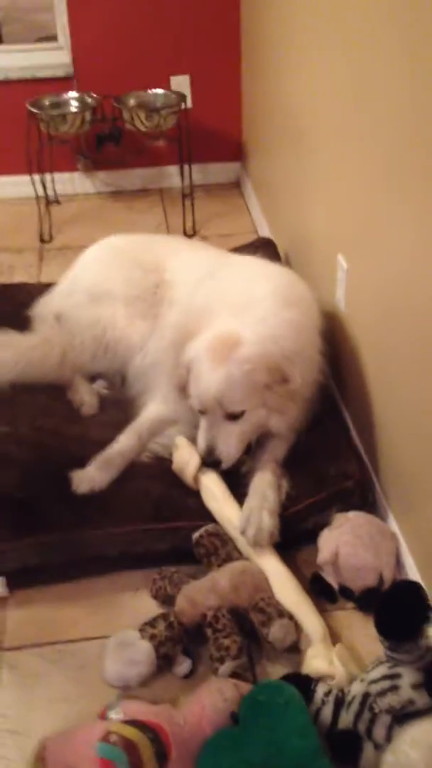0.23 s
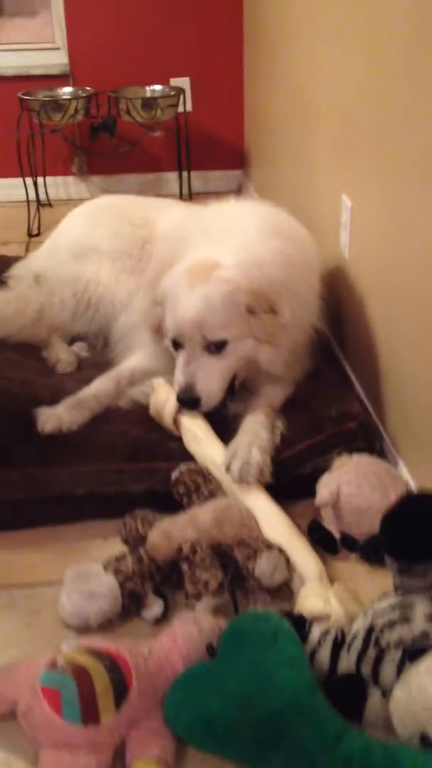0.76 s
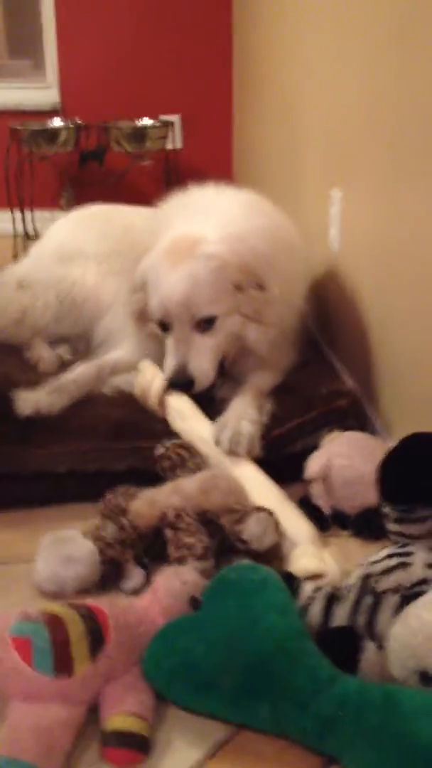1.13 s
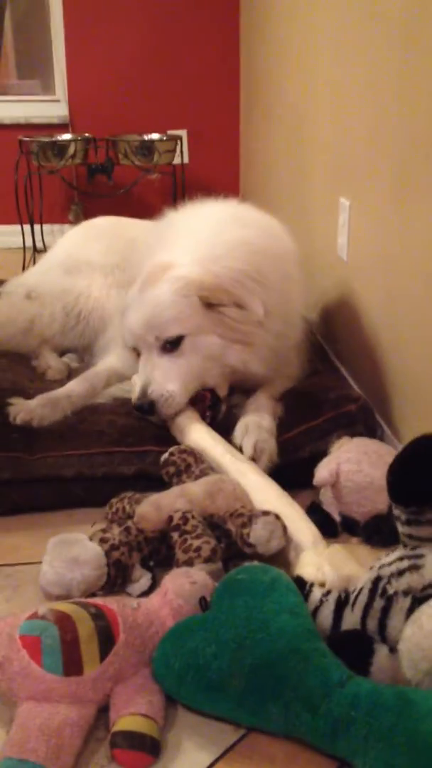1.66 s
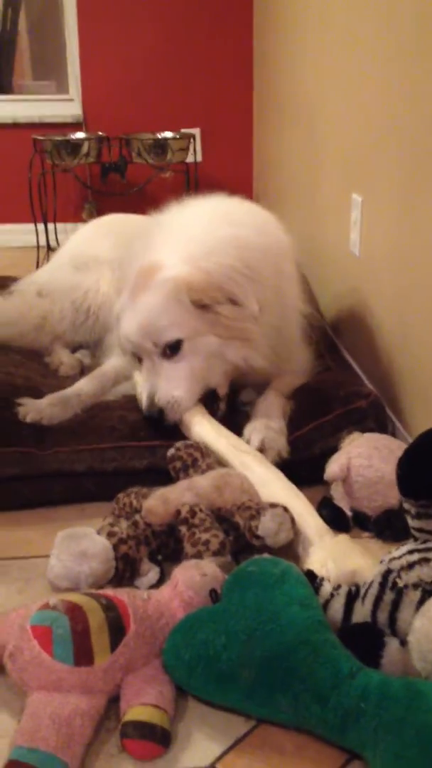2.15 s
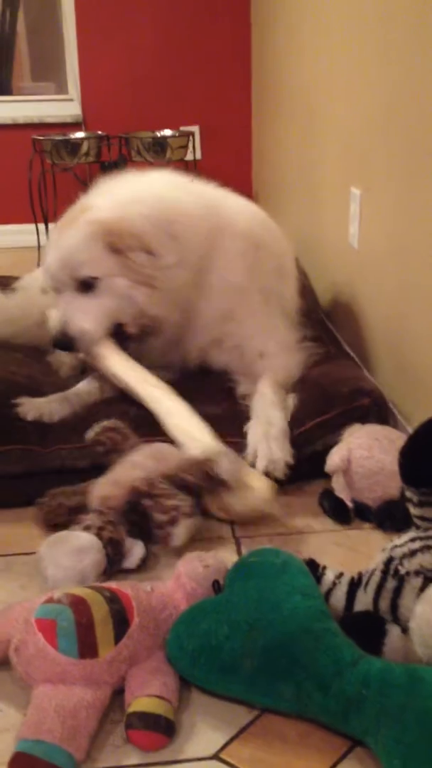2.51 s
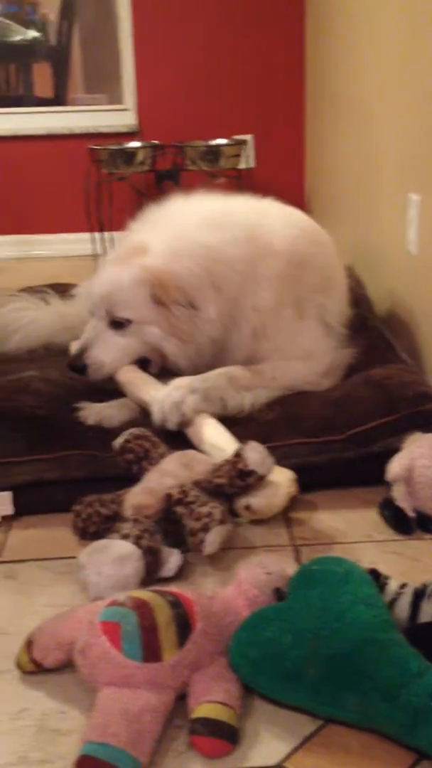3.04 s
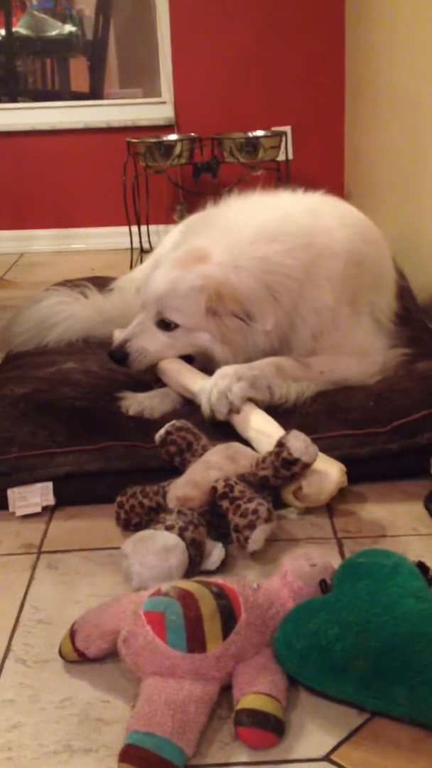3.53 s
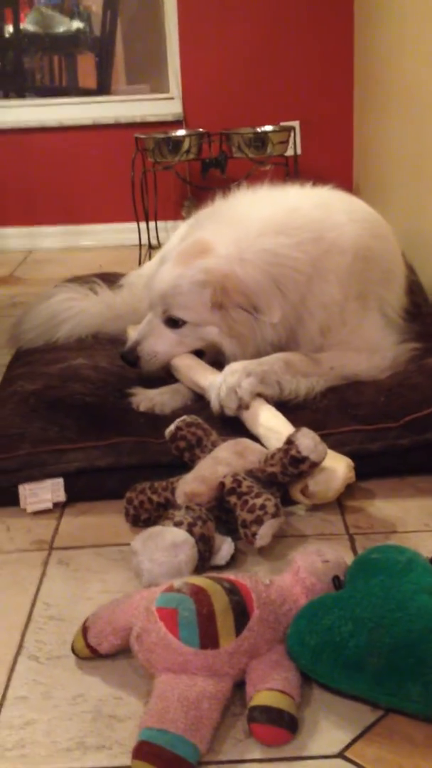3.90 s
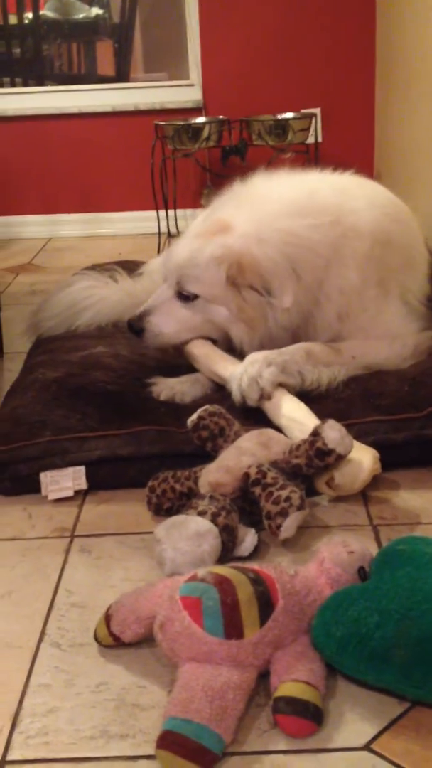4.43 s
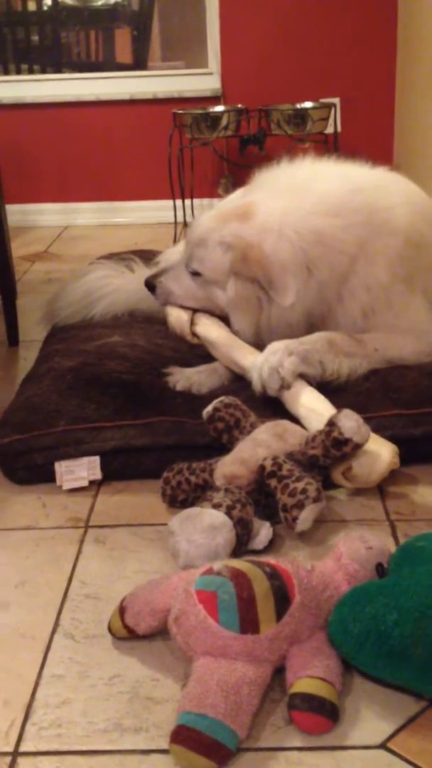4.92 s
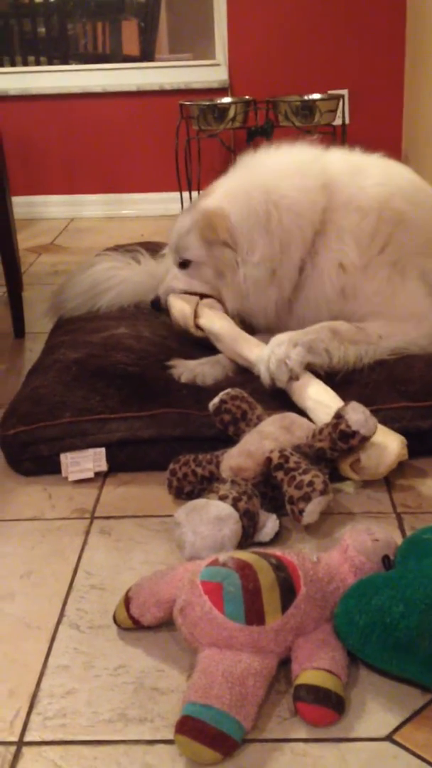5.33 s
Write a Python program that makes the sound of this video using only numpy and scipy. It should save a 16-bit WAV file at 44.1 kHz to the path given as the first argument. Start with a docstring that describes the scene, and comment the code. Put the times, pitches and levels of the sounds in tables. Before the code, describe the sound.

A large dog gnaws a dry rawhide bone on its bed in a hard, tiled room, heard from about two metres, identical in both channels. From 0 to 1.3 seconds there are only faint, scattered ticks, small soft knocks and a light brushing hiss. At about 1.4 the teeth bite in: brittle, hollow snaps and short gritty scrapes crowd together until 1.85, the hardest around 1.7 to 1.84, with dull bone knocks. After a brief lull, a denser grinding crunch runs from 2.2 to 2.5, with bedding shifting darkly. One bright, crisp crack comes at 2.82, with a small follow-up at 2.89. Weak nibbles at 3.3 to 3.65 lead to a compact crunch at 3.8 to 3.93. Then sparse, faint ticks and muted knocks near 4.2, 4.5 and 5.0 fade toward 5.5. Short room echoes trail the cracks; a faint wavering low hum and soft hiss persist.

```python
"""A dog gnaws a dry rawhide bone on its bed in a tiled room, two metres from one microphone.
Teeth crack and grind the hide: noise bursts and grainy strokes excite short damped resonances.
The bone knocks dully (brief low pushes with a puff of noise); a bright hiss swells, partly as a wash
around the cracks, and the bedding shifts darkly, both as coloured noise.
Echoes and a decaying noise tail form the hard room, over a faint wavering hum, drone and steady hiss."""
import sys
import numpy as np
from scipy import signal
from scipy.fft import rfft, irfft, next_fast_len
from scipy.io import wavfile
from scipy.ndimage import uniform_filter1d

SR = 44100
rng = np.random.default_rng(int(sys.argv[2]) if len(sys.argv) > 2 else 0)


def dump_mix(stems):
    """Bounce the given channels to the path in sys.argv[1] as a 16-bit WAV at rate SR."""
    frames = np.atleast_2d(stems).T  # one column per channel
    limited = np.clip(frames, -1, 1)  # hard clip at full scale
    pcm = np.round(limited * 32767).astype(np.int16)
    wavfile.write(sys.argv[1], SR, pcm)


N = 244975

# dull knocks of the bone on the bed: (time [s], level [dB], pitch [Hz])
KNOCK_EVENTS = [(0.169, -52, 478), (0.332, -51, 182), (0.567, -51.5, 385), (0.679, -78, 686),
                (1.426, -51, 223), (1.499, -55, 406), (1.727, -41, 475), (1.838, -41.5, 598),
                (1.976, -40.5, 430), (2.838, -52.5, 412), (2.887, -46, 394), (3.066, -69, 233),
                (3.476, -49, 550), (4.207, -57.5, 216.5), (4.491, -45.5, 295), (4.766, -57.5, 196),
                (4.782, -66, 690), (4.945, -48, 570), (4.992, -45.5, 537), (5.02, -53, 810)]
# free end of the bone: pitch under grinding, width always
END_HZ, END_WIDTH_HZ = 2135, 327


def amp(db):
    """Amplitude gain of a level in dB."""
    return 10 ** (np.asarray(db) / 20)


def unit(x):
    """x scaled to rms 1."""
    return x / np.sqrt(np.mean(x ** 2) + 1e-20)


def along(points, hz, column=1):
    """A column of (Hz, value, ..) points, interpolated on a log-frequency axis."""
    p = np.transpose(points)
    return np.interp(np.log(hz + 1), np.log(p[0] + 1), p[column])


def curve(rows, column=1, outside=-200):
    """A column of (s, value, ..) rows, one value per sample; `outside` beyond the rows."""
    p = np.transpose(rows)
    return np.interp(np.arange(N) / SR, p[0], p[column], outside, outside)


def filtered(x, response):
    """x filtered by a complex response of frequency."""
    size = next_fast_len(N + SR // 2)
    hz = np.fft.rfftfreq(size, 1 / SR)
    return irfft(rfft(x, size) * response(hz), size)[..., :N]


def ringing(modes, order=1):
    """Causal response of damped (Hz, width Hz, dB) modes passed order times, unit power for white noise."""
    def raw(hz):
        total = 0
        for k, (centre, width, db) in enumerate(modes):
            damping = 1j * hz * abs(width)
            sign = (-1) ** k
            total = total + sign * amp(db / order) * damping / (centre ** 2 - hz ** 2 + damping)
        return total ** order

    def response(hz):
        h = raw(hz)
        return h / np.sqrt(np.mean(abs(h) ** 2))

    return response


def grainy(rate, spread_db):
    """Noise of rms 1 whose gain wanders between random knots, rate a second."""
    knots = np.clip(rng.standard_normal(int(N * 2000 / SR) + 2), -2.2, 2.2)
    wander = np.interp(np.arange(N) * rate / SR, np.arange(len(knots)), knots)
    return unit(rng.standard_normal(N) * amp(spread_db * wander))


def rush(x, spectrum, patchy_db):
    """Coloured noise of rms 1 with time-frequency patches of random gain."""
    z = signal.stft(x, nperseg=512)[2]
    field = uniform_filter1d(rng.standard_normal(z.shape), size=6, axis=0)
    field = uniform_filter1d(field, size=10, axis=1)
    patched = signal.istft(z * amp(patchy_db * unit(field)), nperseg=512)[1][:N]
    return unit(filtered(patched, lambda hz: amp(along(spectrum, hz))))


def stroke(start_s, hold_s, attack_s, fade_db_per_s):
    """Gain that rises linearly, then fades exponentially once attack_s + hold_s have passed."""
    t = np.arange(N) / SR - start_s
    return np.clip(t / attack_s, 0, 1) * amp(-fade_db_per_s * np.maximum(t - attack_s - hold_s, 0))


def swelling_hiss():
    """Bright, grainy coloured noise that swells, partly as a reverberant wash around the cracks."""
    # spectrum: (frequency [Hz], relative density [dB])
    hiss_spectrum = [(350, -35.5), (600, -21), (1410, -1), (1640, 2), (2180, 1), (3800, 1), (4700, 2),
                     (5400, -3), (6640, 1.5), (9360, -13), (13800, -12), (15400, -16), (16000, -42)]
    # swells: (time [s], level [dB])
    hiss_level = [(0, -67), (.12, -71), (.18, -64.5), (.38, -58.5), (.56, -62), (.8, -62.5), (1.05, -58.5),
                  (1.19, -64), (1.31, -69.5), (1.42, -64.5), (1.78, -76), (1.85, -58), (2.17, -71),
                  (2.27, -51.5), (2.5, -53.5), (2.8, -71.5), (2.86, -50.5), (3.1, -73), (3.78, -73),
                  (3.89, -63), (4.01, -71), (4.5, -76.5), (5.45, -75.5), (5.55, -70)]
    return amp(curve(hiss_level)) * rush(grainy(rate=700, spread_db=1.0), hiss_spectrum, patchy_db=1.6)


def bedding():
    """Bedding shifts as dark, grainy coloured noise, also stirred by each knock."""
    # spectrum: (frequency [Hz], relative density [dB])
    bedding_spectrum = [(70, -13), (130, -1.5), (190, 4), (280, -2.5), (500, -4.5), (850, -5), (1500, -10),
                        (3000, -59)]
    # shifting: (time [s], level [dB])
    bedding_level = [(0, -74), (.12, -72), (.2, -65), (.8, -65), (1.1, -63), (1.35, -70.5), (1.7, -66),
                     (2.15, -60), (2.42, -52.5), (2.62, -65), (2.8, -72), (2.92, -55.5), (3.14, -59),
                     (3.3, -68), (3.6, -68.5), (4.15, -72.5), (4.32, -66), (4.7, -81), (5.02, -64.5),
                     (5.2, -73), (5.55, -72)]
    # stirring by a -50.5 dB knock, growth per dB of knock, fade
    settle_db, settle_db_per_db, settle_fade_db_per_s = -57.5, 0.94, 452

    stirred = np.zeros(N)
    for s, db, _ in KNOCK_EVENTS:
        level_db = settle_db + settle_db_per_db * (db + 50.5)
        stirred += amp(level_db) * stroke(s, 0, 0.011, settle_fade_db_per_s)
    gain = np.hypot(amp(curve(bedding_level)), stirred)
    return gain * rush(grainy(rate=70, spread_db=1.5), bedding_spectrum, patchy_db=2.0)


def background():
    """A far appliance's hum, wavering in level and phase, its resonant-noise drone, and steady hiss."""
    # drone mode: (frequency [Hz], width [Hz], relative level [dB])
    drone_mode = [(186.2, 20, 0)]
    # steady hiss spectrum: (frequency [Hz], relative density [dB])
    steady_spectrum = [(20, 13), (60, 16.5), (100, 5.5), (200, 8), (400, 5.5), (850, -22), (1500, -6),
                       (5700, -25), (10000, -19.5), (14500, -10.5)]
    hum_hz, hum_db = 120, -73.5  # level before the waver

    waver = unit(uniform_filter1d(rng.standard_normal((2, N)), size=3000, axis=1))
    phase = 2 * np.pi * hum_hz * np.arange(N) / SR + 0.9 * waver[1]
    hum = np.sqrt(2) * amp(hum_db + 3.5 * waver[0]) * np.sin(phase)
    drone = amp(-77.0) * filtered(rng.standard_normal(N), ringing(drone_mode, order=2))
    steady_hiss = amp(-70.5) * rush(rng.standard_normal(N), steady_spectrum, patchy_db=0.0)
    return hum + drone + steady_hiss


def colours(hz, end_hz, end_db, order, blur=1):
    """Responses of the hide's four rings; the lowest also carries the free end's narrow mode."""
    # one list per ring, low to top: (frequency [Hz], width [Hz], relative level [dB])
    hide_rings = [
        [(1483, 590, 2), (2560, 760, 5)],
        [(3053, 1020, 0), (4125, 555, 9), (4810, 610, 1.5)],
        [(5490, 800, -3), (6570, 520, 0), (7720, 1000, -12)],
        [(10300, 4600, -20), (12600, 3200, 27)],
    ]
    out = []
    for modes in hide_rings:
        blurred = [(centre, blur * width, db) for centre, width, db in modes]
        out.append(ringing(blurred, order)(hz))
    out = np.array(out)
    out[0] += amp(end_db) * ringing([(end_hz, END_WIDTH_HZ, 0)], order)(hz)
    return out


def cracks():
    """Bursts of tiny fractures ring the hide; returns sound toward the microphone and its room send."""
    # (time [s], length [ms], low ring level [dB], bite: middle over low [dB], sharpness: top over low [dB])
    crack_rows = [(0.1484, 4.8, -58.5, 0, -20), (0.2169, 0.48, -59, 0, -23), (0.246, 1.4, -70, 10, -17),
                  (0.2717, .2, -56.5, -1, -28), (0.3557, .32, -51.5, 6.5, -38),
                  (0.5734, 0.77, -66.5, 13, -3), (0.6795, 3.5, -60, -8, -8), (0.8312, 0.15, -64, 16, -1),
                  (1.3374, 6.5, -56.5, -1, -13), (1.4223, 1.3, -54.5, -6, -23),
                  (1.4432, 0.66, -41, -1, -26), (1.4524, 0.2, -39, -8, -36), (1.4579, 1.4, -38.5, -22, -34),
                  (1.4791, 1, -52.5, 3, -20), (1.547, 0.78, -43.5, -6, -38), (1.5542, 0.65, -36, -18, -36),
                  (1.5566, 2.1, -44, -2.5, -26), (1.575, 2.4, -53, -16, -30), (1.5893, 1.6, -52, 5.5, -26),
                  (1.6151, 2.1, -55, -14, -26), (1.6434, 0.36, -41, -18, -38),
                  (1.693, .3, -31.5, -13.5, -33), (1.7164, .4, -48, -18, -36), (1.7323, 2.3, -54.5, 2, -11),
                  (1.777, 0.52, -36, -17, -33), (1.7985, 1.3, -42, -8, -23), (1.8192, 0.37, -30, -8.5, -31),
                  (1.8269, 0.79, -49, -12, -25), (1.836, 3.3, -37, 0.5, -16), (1.8402, 1.85, -28, 0.5, -27),
                  (1.977, 2.3, -55.5, 6.5, -14), (1.9803, 4.3, -52.5, -1, -29),
                  (2.0827, 0.44, -48, -7, -23), (2.0934, 3.8, -52, -10, -26), (2.2045, 4, -38, -11, -28),
                  (2.2086, 5, -45, -19, -35), (2.2203, 0.36, -39, -31, -31), (2.2313, 1, -42, -14, -29),
                  (2.2367, 2.3, -38, -16, -27), (2.2462, 1.3, -40, -10, -30), (2.2681, 1.34, -33, -13, -26),
                  (2.2779, 0.89, -47, -11, -25), (2.2891, 2.4, -39.5, -3, -18), (2.307, 11.8, -35, -1, -31),
                  (2.3171, 0.59, -36.5, 6.5, -36), (2.356, 2.4, -51.5, 6, -23),
                  (2.3856, 1.1, -52.5, 13.5, -16), (2.415, 3.8, -48.5, 3, -36),
                  (2.4253, 1.4, -39, 2.5, -34), (2.429, 3.8, -39, 2, -34), (2.4734, 2.7, -38, -1, -25),
                  (2.542, 1.1, -50.5, 2, -7), (2.7302, 0.95, -61, -8, -10), (2.8177, 2.06, -35, -2, -9.5),
                  (2.8235, 0.49, -49, -5, -16), (2.8347, 0.4, -48.5, 6, -15),
                  (2.8923, 0.78, -42.5, -2.5, -31), (3.0709, .91, -53, -5, -23),
                  (3.3119, 1.6, -62, -13, -16), (3.3781, 0.99, -62.5, -14, -27),
                  (3.4764, 3.4, -60, -3, -23), (3.498, 1.6, -60, -2, -33), (3.616, 1.8, -63, 0, -24),
                  (3.6424, 4, -55.5, 1.5, -30), (3.657, 2.2, -55.5, -7, -35),
                  (3.8141, 0.73, -43.5, -0.5, -24), (3.8226, 0.36, -42.5, 2, -29),
                  (3.8532, 0.76, -41, -4, -40), (3.8894, 1.05, -38, -1, -1), (3.9092, 0.65, -43, 5, -20),
                  (3.927, 0.66, -44.5, -22, -22), (4.2062, 0.73, -56.5, -9, -41),
                  (4.2585, 2.2, -63.5, -9, -24), (4.4932, 1, -59.5, -7, -16), (4.4992, 4.1, -56.5, 0, -18),
                  (4.541, 2.5, -58.5, -12, -26), (4.939, 1.2, -59, 6.5, -13), (4.9535, 2.5, -58, 0, -21),
                  (4.9947, 6.1, -70, -8, -12), (5.013, 2.1, -62, -14, -23), (5.2994, 1.9, -70, -16, -17),
                  (5.4748, 3, -64, -12, -27), (5.5208, 1.44, -58.5, -7, -31)]
    # shifting grip and turning head: (time [s], free-end pitch [Hz], room send [dB])
    grip = [(0, 1990, 10), (1.3, 1610, 7.5), (1.5, 2370, 1), (1.65, 2130, 4), (2.1, 2130, 4.5),
            (2.24, 2150, -10), (2.33, 2150, 0.5), (2.45, 2370, 5), (2.83, 2090, 5.5), (3.1, 1510, 16.5),
            (3.65, 1770, 10.5), (3.82, 2340, -1.5), (3.93, 2120, 6.5), (4.2, 1790, 9), (4.49, 2330, 11.5),
            (4.6, 2380, 2), (4.95, 1910, 10.5), (5.55, 1500, 15)]
    # low ring of jaw and bed, heard only via the room: (frequency [Hz], width [Hz], relative level [dB])
    body_mode = [(892, 164, 0)]
    # high ring: share of the way from bite to sharpness (capped), plus an offset
    high_share, high_offset_db, sharp_cap_db = 0.44, 5.5, -9
    end_db_per_bite_db = -0.28  # a duller crack rings the free end more

    direct, spread = np.zeros(N + SR), np.zeros(N + SR)
    t = np.arange(1024) / SR
    hz = np.fft.rfftfreq(2048, 1 / SR)
    body = irfft(ringing(body_mode)(hz))
    end_pitch_hz, send_db = curve(grip), curve(grip, column=2)
    for s, ms, db, bite, sharp in crack_rows:
        start = round(s * SR)
        end_hz = end_pitch_hz[start]
        high = bite + high_share * (min(sharp, sharp_cap_db) - bite) + high_offset_db
        ring_db = db + np.array([0, bite, high, sharp])
        ms = max(ms, .15)
        # full strength for ms, then 60 dB down per 0.6 ms
        fractures = rng.standard_normal(len(t)) * amp(-60 * np.maximum(t - ms / 1000, 0) / 0.0006)
        fractures[0] += 5 * (ms < 2.5)  # a short crack starts with one clean snap
        end_db = 1 + end_db_per_bite_db * bite
        rung = irfft(rfft(fractures, 2048) * colours(hz, end_hz, end_db, order=2))
        # broader rings: the smoother sum over all directions
        snap = irfft(colours(hz, end_hz, end_db=-4.5, order=1, blur=2.13))
        size = amp(ring_db) * np.sqrt(SR * (ms + 1) / 1000)  # level over ms + 1 to energy
        at = slice(start, start + len(body))
        direct[at] += (size / np.linalg.norm(rung, axis=1)) @ rung
        all_round = (size / np.linalg.norm(snap, axis=1)) @ snap
        spread[at] += amp(send_db[start]) * (all_round + amp(-15) * size[1] * body)
    return direct[:N], spread[:N]


def grinding():
    """Teeth stroke along the hide: a dense grainy stream of fractures rings it and the free end."""
    # (start [s], hold [s], low ring level [dB], level change per step up the rings [dB])
    grind_rows = [(1.327, 0.065, -70.5, -0.5), (1.421, 0.028, -54, -7), (1.534, 0.037, -49, -6),
                  (1.7, 0.028, -66, -1.5), (1.801, .035, -52.5, -3.5), (2.189, 0.072, -48, -7),
                  (2.268, 0.043, -50.5, -2.5), (2.332, 0.077, -51.5, -5.5), (2.44, 0.083, -54, -6),
                  (3.5, 0.039, -67.5, -6.5), (3.593, 0.24, -70.5, -3.5), (3.805, 0.14, -52.5, -4),
                  (4.927, 0.06, -61, -4.5), (5.47, 0.065, -70, -5)]
    # steps from the low ring to each ring: (steps)
    ring_steps = [0, 1.5, 2.2, 5.5]
    press_s, let_go_db_per_s = 0.022, 304
    end_db, end_step = -10.5, -0.76  # free end: stronger in duller strokes

    steps = np.append(ring_steps, end_step)[:, None]
    levels = amp(np.hstack([db + steps * step_db for _, _, db, step_db in grind_rows]))
    strokes = np.array([stroke(s, hold, press_s, let_go_db_per_s) for s, hold, _, _ in grind_rows])
    force = grainy(rate=500, spread_db=4.0) * (levels @ strokes)
    hide = filtered(force[:-1], lambda hz: colours(hz, END_HZ, end_db=-17, order=2)).sum(axis=0)
    free_end = filtered(force[-1], ringing([(END_HZ, END_WIDTH_HZ, 0)], order=2))
    return hide + amp(end_db) * free_end


def gnawing():
    """Cracks and grinding of the hide; returns (toward the microphone, sent into the room)."""
    direct, spread = cracks()
    grind = grinding()
    return direct + grind, spread + grind


def knocks():
    """A soft contact: a cycle or two of a low push, with a puff of cloth."""
    out = np.zeros(N + SR)
    t = np.arange(SR // 8) / SR
    for s, db, hz in KNOCK_EVENTS:
        push = np.sin(2 * np.pi * hz * t) * np.exp(-((t - .006) * hz / 0.79) ** 2)
        cloth = np.convolve(rng.standard_normal(len(t)), np.hanning(26) / 4, "same")
        puff = cloth * amp(-10.5 - 60 * t / 0.019) * np.minimum(t / 0.0011, 1)
        out[round(s * SR):][:len(t)] += amp(db) * (push + puff)
    return out[:N]


def room(direct, spread):
    """Early wall echoes, then a noise tail dying by frequency, drawn anew for each 0.25 s of sound."""
    # first echoes: (delay [ms], level [dB])
    wall_echoes = [(2.2, -43), (4.6, -13.5), (17.5, -15)]
    # tail: (frequency [Hz], 60 dB decay time [s], relative level [dB])
    tail_bands = [(140, 0.48, 0), (860, 0.68, 0), (1780, 0.87, -6.5), (4850, 0.67, -8), (6740, 0.66, -6),
                  (13100, 0.27, -2.5)]
    gather_s = 0.0052  # echoes take a moment to build up

    out, step = direct.copy(), SR // 4
    for ms, db in wall_echoes:
        lag = round(ms * SR / 1000)
        out[lag:] += amp(db) * direct[:-lag]
    out = np.pad(out, (0, 2 * SR))
    for start in range(0, N, step):
        hz, t, z = signal.stft(rng.standard_normal(SR), SR, nperseg=256)
        decay_db = -60 * t / along(tail_bands, hz)[:, None]
        z = z * amp(along(tail_bands, hz, column=2)[:, None] + decay_db)
        tail = signal.istft(z, SR, nperseg=256)[1]
        tail *= 1 - np.exp(-np.arange(len(tail)) / SR / gather_s)
        wet = signal.fftconvolve(spread[start:start + step], tail)
        out[start:start + len(wet)] += amp(-36) * wet
    return out[:N]


def scene():
    """Gnawing and knocks in the room, plus hiss, bedding and background; same in both channels."""
    direct, spread = gnawing()
    thuds = knocks()
    mono = room(direct + thuds, spread + amp(1.5) * thuds)
    mono = mono + swelling_hiss() + bedding() + background()
    return np.array([mono, mono])


def record(dry):
    """The microphone loses deep bass (three first-order high-passes); a steep cut limits the top."""
    bass_hz, top_hz = 126.4, 15450

    def response(hz):
        bass_cut = (1j * hz / (bass_hz + 1j * hz)) ** 3
        return bass_cut / (1 + (hz / top_hz) ** 200)

    return np.array([filtered(channel, response) for channel in dry])


dry = scene()
out = record(dry)
dump_mix(out)
```